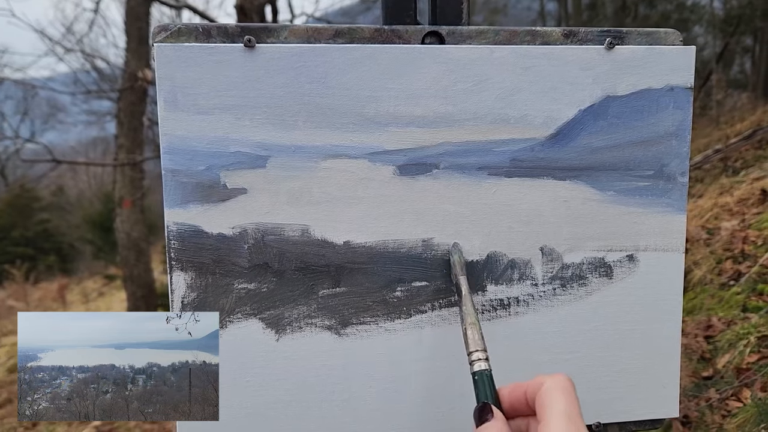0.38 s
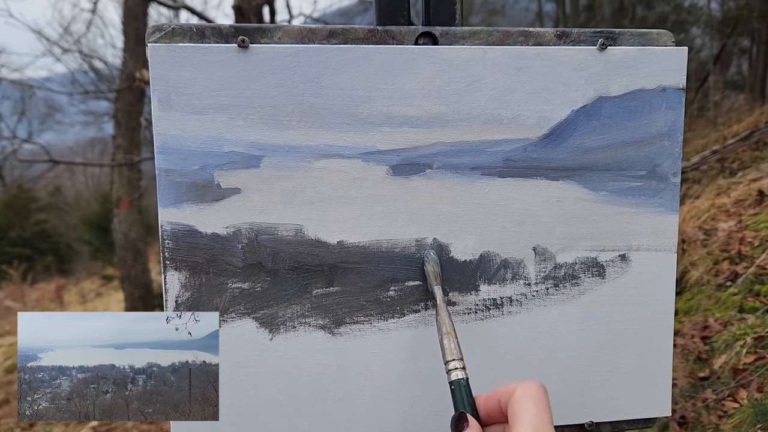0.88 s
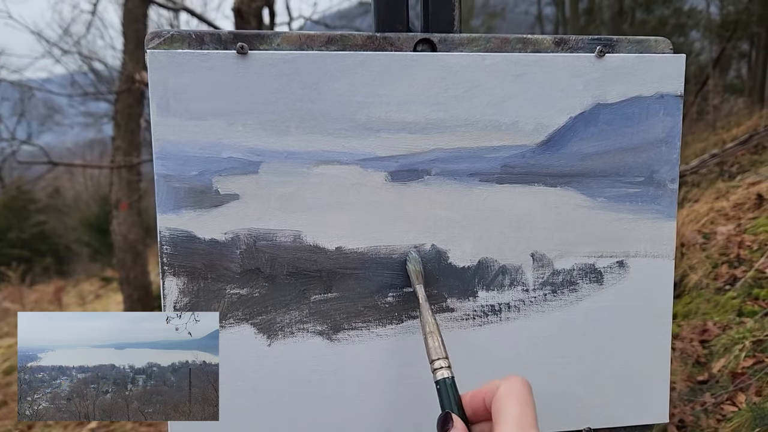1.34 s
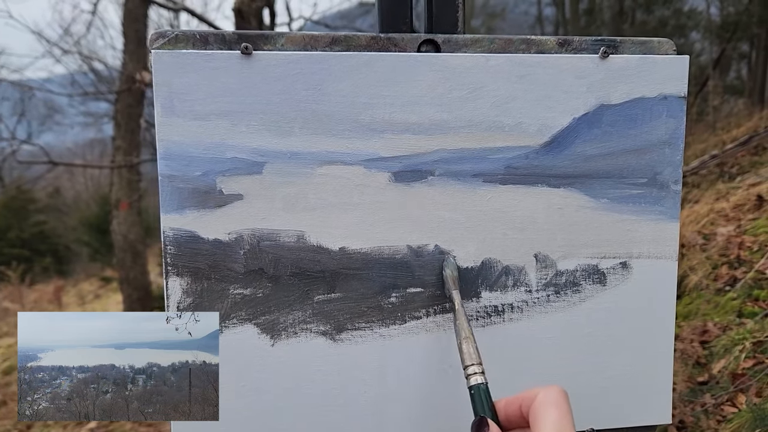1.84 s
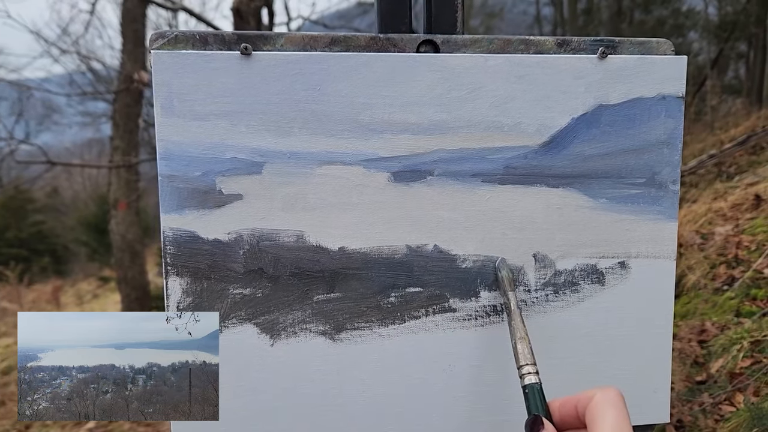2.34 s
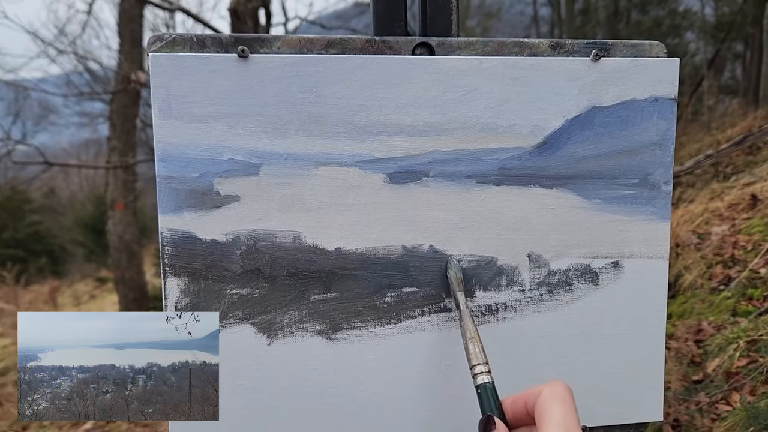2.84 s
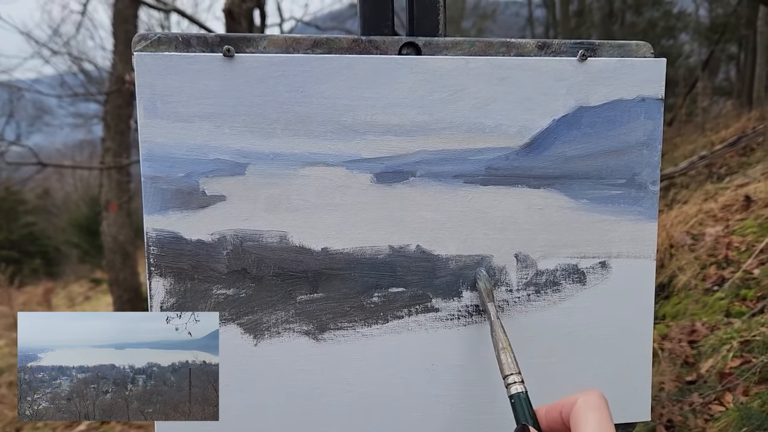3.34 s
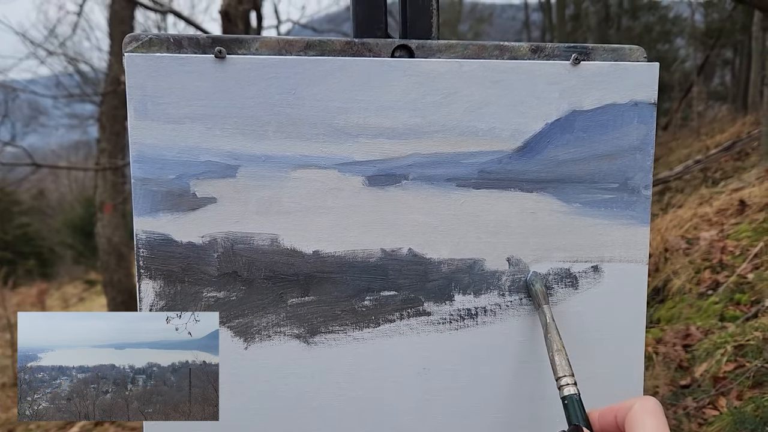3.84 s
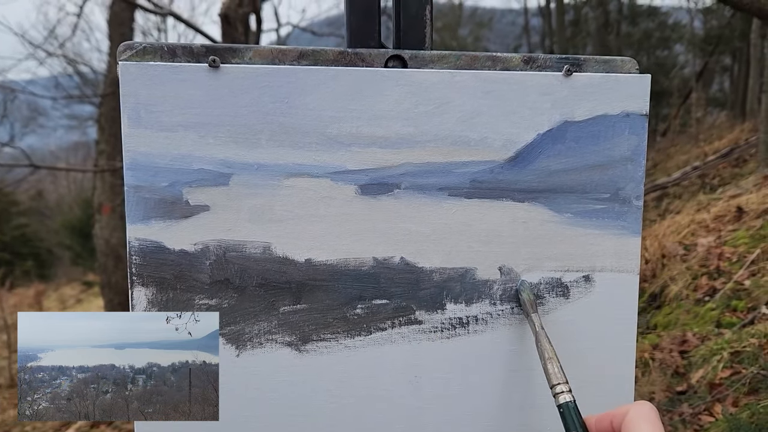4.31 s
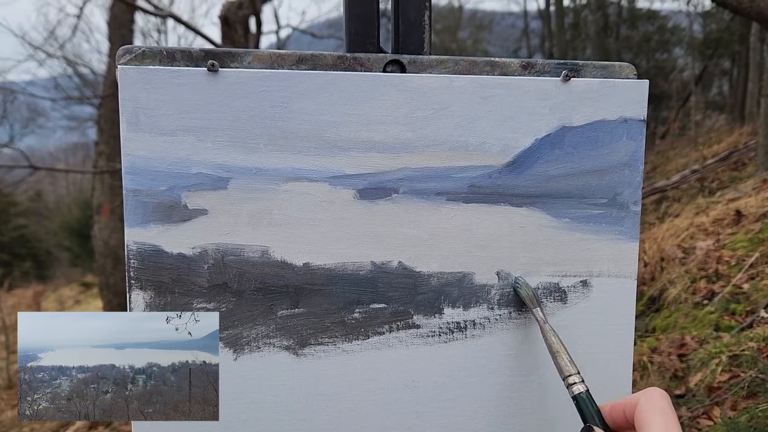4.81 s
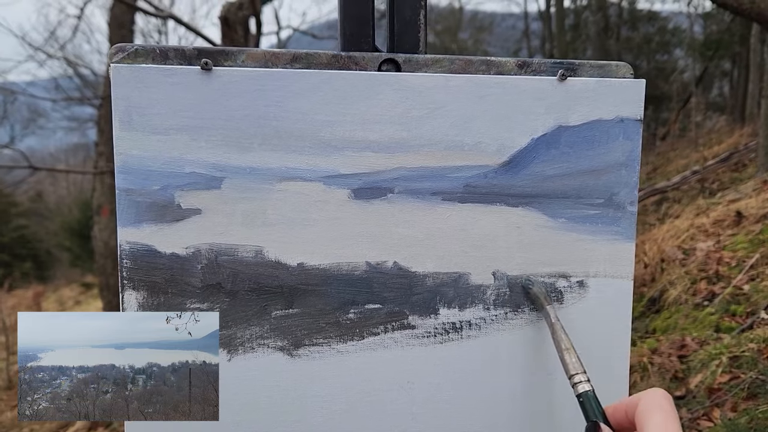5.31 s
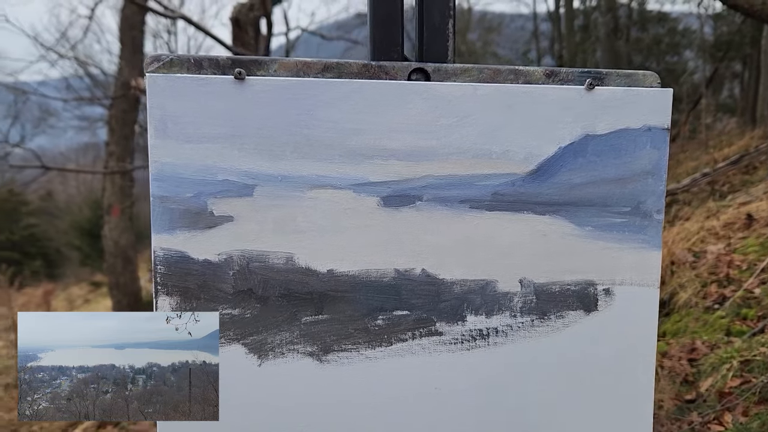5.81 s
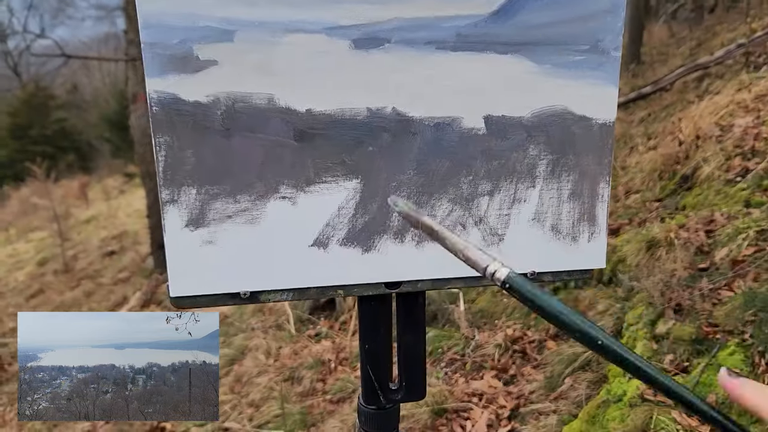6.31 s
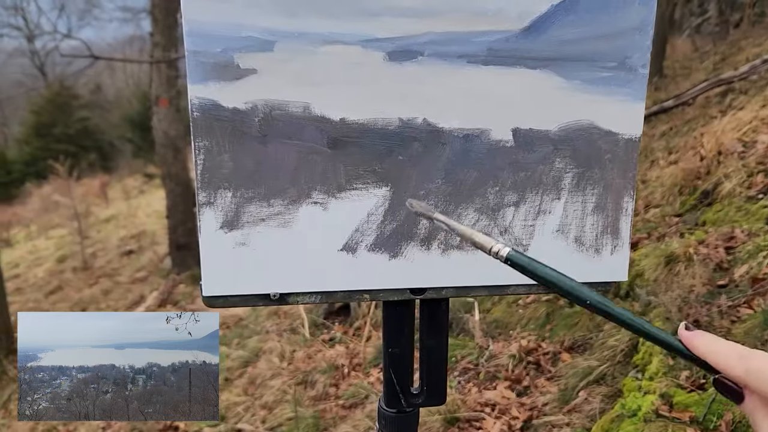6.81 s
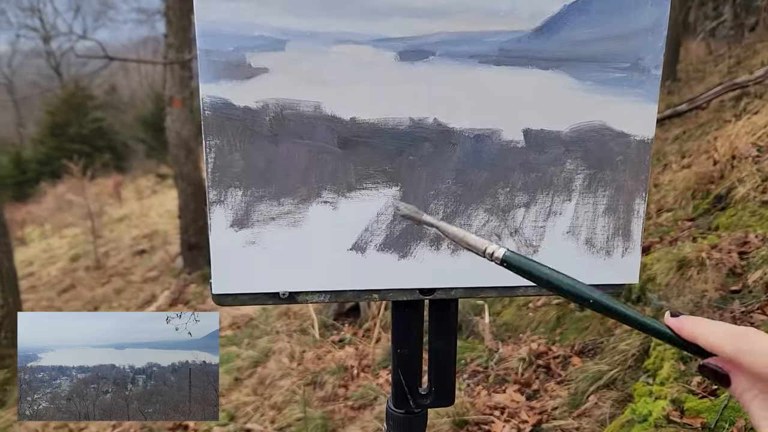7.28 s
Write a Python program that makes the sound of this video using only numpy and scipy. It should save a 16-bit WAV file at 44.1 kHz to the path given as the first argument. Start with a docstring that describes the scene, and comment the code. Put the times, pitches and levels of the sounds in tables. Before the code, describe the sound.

A bristle brush scrubs paint onto a thin panel in faint, irregular scratchy strokes outdoors, over a steady low rumble of wind.

```python
"""A bristle brush scrubs paint onto a thin panel on an easel outdoors, close to a two-port recorder.
Tips hiss and the belly drags and rasps, both as noise with sparse grains; the panel rings in a few modes,
and a few dry ticks crack. Behind lie a hollow murmur of drifting narrow-band noise, a low rumble of wind,
a far rush of air in trees as coloured stereo noise, and microphone hiss.
Late on, the sound cuts to another place."""
import sys
import numpy as np
from scipy import signal
from scipy.fft import rfft, irfft, next_fast_len
from scipy.io import wavfile
from scipy.ndimage import uniform_filter1d, map_coordinates

SR = 44100
rng = np.random.default_rng(int(sys.argv[2]) if len(sys.argv) > 2 else 0)


def boost(x):
    """Linear amplitude factor 10**(x/20) for a level x in decibels (scalar or array-like)."""
    u = np.asarray(x, float) / 20
    return 10 ** u


def materialize(psi):
    """Save the field psi as 16-bit PCM at rate SR to the path in sys.argv[1].

    A 1-D psi becomes a single channel; in a 2-D psi each row is a channel.
    """
    bounded = np.clip(np.atleast_2d(psi).T, -1, 1)
    quanta = np.round(bounded * 32767).astype(np.int16)
    wavfile.write(sys.argv[1], SR, quanta)


N = 326942
CUT_S = 6.267  # the cut to another place
FIRM_DB, FIRM_S = -70, .17  # tips level and length of a firm stroke, the reference for rasp and sheen
PANEL_LATE_S = 0.0033  # the panel answers a little after the tips


def unit(x):
    """Scaled to rms 1."""
    return x / np.sqrt(np.mean(x ** 2) + 1e-20)


def along(points, hz):
    """(f/Hz, value) points read on a log frequency axis."""
    f, value = np.transpose(points)
    return np.interp(np.log(hz + 1), np.log(f + 1), value)


def curves(rows):
    """One value per sample for each column after the time."""
    s, *columns = np.transpose(rows)
    return [np.interp(np.arange(N) / SR, s, column) for column in columns]


def wobble(rate):
    """A smooth random curve, rate knots a second."""
    knots = rng.standard_normal(int(N * rate / SR) + 4)
    return map_coordinates(knots, [np.arange(N) * rate / SR])


def filtered(x, response):
    """x shaped by a response that is a function of frequency."""
    m = next_fast_len(N + 8192)
    return irfft(rfft(x, m) * response(np.fft.rfftfreq(m, 1 / SR)), m)[..., :N]


def coloured(x, spectrum):
    """x shaped by a table of (f/Hz, level/dB)."""
    return filtered(x, lambda hz: boost(along(spectrum, hz)))


def split(x, hz):
    """Parts of x under and over a frequency, each of rms 1."""
    low = filtered(x, lambda f: 1 / (1 + (f / hz) ** 12))
    return unit(low), unit(x - low)


def resonance(f, hz, width):
    """Response of one damped mode."""
    return 1j * f * width / (hz * hz - f * f + 1j * f * width)


def field(shape, bins, frames):
    """A random map over frequency and time, smooth over some bins and frames."""
    smooth = uniform_filter1d(rng.standard_normal(shape), bins, 0)
    return unit(uniform_filter1d(smooth, frames, 1))


def ports(pair, balance):
    """Each microphone port has its own colour; half the tilt goes to either side."""
    return filtered(pair, lambda hz: boost(np.outer([.5, -.5], along(balance, hz))))


# brush strokes: [t/s of the peak, rise/s, fall/s, tips/dB, drag/dB, panel/dB]; rise and fall span 20 dB
BRUSH_STROKES = [(0.215, 0.087, 0.02, -76.0, -84, -84), (0.259, 0.054, 0.059, -71.5, -79.0, -66.5),
                 (0.423, 0.016, 0.024, -77.5, -84, -79.0), (0.478, 0.19, 0.094, -86, -83, -66.5),
                 (0.611, 0.075, 0.038, -86, -92, -75), (0.724, 0.054, 0.039, -87, -84, -63),
                 (0.829, 0.05, 0.035, -84.5, -83, -73), (0.904, 0.041, 0.051, -81, -86, -60.5),
                 (0.925, 0.064, 0.22, -88.5, -80.5, -70.5), (1.165, 0.061, 0.14, -77.5, -72.5, -61.5),
                 (1.3, 0.169, 0.086, -79, -73, -69.5), (1.431, 0.14, 0.082, -82, -80, -63),
                 (1.698, 0.082, 0.077, -69.5, -72.5, -62.5), (1.79, 0.26, 0.23, -79.5, -67.5, -68),
                 (1.855, 0.027, 0.053, -78.0, -76, -71), (2.21, 0.12, 0.096, -69.0, -73.5, -63.5),
                 (2.642, 0.085, 0.106, -83.5, -84, -81), (2.767, 0.09, 0.043, -85.0, -74, -60.0),
                 (3.011, 0.093, 0.098, -69, -75, -64), (3.357, 0.12, 0.088, -87.0, -93, -78),
                 (3.479, 0.1, 0.08, -89.5, -83, -65.5), (3.683, 0.069, 0.096, -63.5, -69.5, -57.0),
                 (4.207, 0.16, 0.11, -79, -72.5, -67.5), (4.292, 0.103, 0.12, -82, -70, -69.5),
                 (4.578, 0.16, 0.058, -81.0, -74.5, -61.5), (4.72, 0.17, 0.088, -76, -70.5, -69),
                 (4.812, 0.097, 0.023, -75.5, -69.5, -69), (4.841, 0.045, 0.17, -71, -68.5, -62.5),
                 (5.085, 0.064, 0.09, -71.5, -68.0, -65), (5.155, 0.076, 0.071, -65.0, -69, -56.5),
                 (5.341, 0.066, 0.07, -60, -60.0, -49.5), (5.589, 0.13, 0.13, -76.5, -83.0, -63.5),
                 (5.715, 0.15, 0.1, -66.5, -60.5, -62.5), (5.81, 0.1, 0.074, -69, -64.5, -67.0),
                 (5.918, 0.28, 0.13, -77.5, -69, -66.5), (6.014, 0.037, 0.1, -80.5, -76.5, -80),
                 (6.211, 0.18, 0.15, -82.5, -71.5, -67.5), (6.271, 0.036, 0.269, -80.5, -70.5, -68.5),
                 (6.42, 0.14, 0.14, -78, -78, -75), (6.487, 0.108, 0.092, -82, -70.5, -66),
                 (6.658, 0.25, 0.1, -78, -69.5, -68.5), (6.737, 0.21, 0.1, -77.0, -69.5, -70.0),
                 (6.941, 0.28, 0.24, -89.0, -83.0, -75.5), (7.3, 0.13, 0.21, -75, -68, -71.5),
                 (7.374, 0.057, 0.069, -74.5, -70, -70.0)]


def stroked(peaks_db, late_s=0):
    """Level in dB over time of all strokes together, each swelling to its peak and dying away."""
    t, power = np.arange(0, N, 64) / SR, 1e-13
    for (s, rise, fall, *_), peak_db in zip(BRUSH_STROKES, peaks_db):
        s = s + late_s
        distance = np.abs(np.where(t < s, (s - t) / rise, (t - s) / fall))
        power = power + boost(peak_db - 20 * distance ** 1.94) ** 2
    return np.interp(np.arange(N) / SR, t, 10 * np.log10(power))


def slips(share, spread_db):
    """Many bristles catch and let go: sparse uneven impulses on a bed of fine noise."""
    sizes = boost(spread_db * rng.exponential(1, N)) * rng.standard_normal(N)
    grains = unit(sizes * (rng.random(N) < .05))
    return np.sqrt(share) * grains + np.sqrt(1 - share) * rng.standard_normal(N)


# colour of the bristle tips: [f/Hz, level/dB]
TIPS_COLOUR = [(3000, -34), (5000, -0.5), (5700, -19.5), (6900, -2), (7400, -4.5), (7800, -8), (8250, 1),
               (8700, 9), (9400, -0.5), (10200, -8), (11500, -4), (12900, -7), (13700, -14.5),
               (14400, -5.5), (15700, -17.5)]


def bristle_tips():
    """Tips hiss: quiet strokes are a narrow band near 7.75 kHz, loud ones fill the band and add a top sheen."""
    _, rise, fall, tips_peak, _, _ = np.transpose(BRUSH_STROKES)
    tips_db = stroked(tips_peak)
    hiss, sheen = split(coloured(slips(0.42, spread_db=4.0), TIPS_COLOUR), hz=10400)
    narrow = unit(filtered(hiss, lambda f: resonance(f, hz=7750, width=750) ** 2))
    spread = np.clip((tips_db + 88) / 24, .15, 1)
    hiss = spread * hiss + np.sqrt(1 - spread ** 2) * narrow
    # long sweeps shine more than short dabs: 2 dB per doubling of length
    sweep_db = stroked(tips_peak + 2 * np.log2((rise + fall) / FIRM_S)) - FIRM_DB
    # below a knee the sheen level falls 3.4 dB for each dB of tips level
    sheen_db = -71 + np.minimum(sweep_db, 3.4 * (sweep_db + 7))
    lift_db = 0.5 * (np.arange(N) >= CUT_S * SR)  # slightly more sheen after the cut
    return boost(tips_db) * hiss + boost(sheen_db + lift_db) * sheen


# colour of the dragging brush: [f/Hz, level/dB]
DRAG_COLOUR = [(1000, -53), (1700, -6.5), (2820, -7.5), (3070, -3), (3200, 0.5), (4370, 3), (4730, 0),
               (6000, -10.5), (7800, -3), (13200, -120)]


def loaded_drag():
    """The belly of the loaded brush drags low and rasps high; the rasp follows both tips and drag."""
    _, _, _, tips_peak, drag_peak, _ = np.transpose(BRUSH_STROKES)
    rasp_peak = -71 + 0.7 * (tips_peak - FIRM_DB) + 0.6 * (drag_peak - FIRM_DB)
    drag, rasp = split(coloured(slips(.25, spread_db=0.5), DRAG_COLOUR), hz=2744)
    return boost(stroked(rasp_peak)) * rasp + boost(stroked(drag_peak)) * drag


# panel resonances: [f/Hz, width/Hz, level/dB]
PANEL_MODES = [(686, 114, 7), (1055, 250, 2), (1441, 192, 1.5), (1850, 720, -17)]


def wood(f):
    """Sum of the damped panel modes with alternating sign, thinned in the bass."""
    modes = sum((-1) ** k * boost(db) * resonance(f, hz, width)
                for k, (hz, width, db) in enumerate(PANEL_MODES))
    return modes / (1 + (480 / (f + 1)) ** 4)


def panel():
    """The brush's slips drive the panel's modes; between strokes it hums on faintly."""
    panel_peak = np.transpose(BRUSH_STROKES)[-1]
    ring = unit(filtered(slips(0.17, spread_db=1.5), wood))
    before = np.arange(N) < CUT_S * SR
    idle = boost(np.where(before, -69, -77) + 0.83 * wobble(7))
    return np.hypot(boost(stroked(panel_peak, PANEL_LATE_S)), idle) * ring


# port colour for near sounds: [f/Hz, left over right/dB]
NEAR_BALANCE = [(300, -6), (1300, 1.5), (2400, -2), (3200, -5.5), (4400, -9.5), (5800, 14), (7500, 3.5),
                (9000, 4.5), (10200, 0.5), (11000, 0), (12300, 3), (14500, 6), (16000, -7)]
# side the brush works on, added to the port colour: [t/s, left over right/dB]
BRUSH_PLACE = [(0.0, 7), (5.2, 5), (5.8, 1.5), (6.44, 5.5), (6.7, 7.5), (7.41, 8.5)]


def near(x, turns, streak_db):
    """Paths from contact to ports: narrow peaks and phase turns that drift as the brush moves."""
    z = signal.stft(x, nperseg=1024)[2]
    paths = []
    for _ in "LR":
        peaks = boost(streak_db * field(z.shape, 2, 10))
        paths.append(peaks * np.exp(1j * turns * field(z.shape, 3, 20)))
    pair = ports(signal.istft(z * paths, nperseg=1024)[1][:, :N], NEAR_BALANCE)
    return pair * boost(np.outer([.5, -.5], *curves(BRUSH_PLACE)))


def brush():
    """Tips and drag chatter together; with the panel they reach the ports along the same paths."""
    chatter = boost(.5 * wobble(60))
    bristles = bristle_tips() + loaded_drag()
    return near(chatter * bristles + panel(), turns=1.78, streak_db=2.5)


# dry ticks of snapping bristles; the last is the click of the cut:
# [t/s, level/dB before the port gains, f/Hz of the ring]
DRY_TICKS = [(.4205, -65, 3600), (4.5635, -62, 7600), (5.4184, -61, 7830), (5.6188, -50, 14900),
             (5.6253, -28, 14200), (5.6276, -34, 14600), (5.7455, -47, 4440), (6.2669, -52, 3500)]


def ticks():
    """Each tick is a brief crack and ring, out of step at the ports, with weaker neighbours around it."""
    out, t = np.zeros((2, N + SR)), np.arange(SR // 100) / SR
    shape = (1 - np.exp(-t / .0003)) * boost(-60 * t / .0022)
    shape = shape / shape.max()
    for tick_s, tick_db, tick_hz in DRY_TICKS:
        for k in range(-2, 3):
            # neighbours lie 0.9 ms apart, lose 12 dB a step and ring at 13.2 kHz
            s, db, hz = tick_s + k * .0009, tick_db - 12 * abs(k), 13200 if k else tick_hz
            crack = np.diff(rng.standard_normal((2, len(t) + 1))) * .26
            ring = np.sin(2 * np.pi * hz * t + rng.uniform(0, 2 * np.pi) + [[0], [2.3]])
            start = round(s * SR)
            out[:, start:start + len(t)] += boost(db) * shape * (ring + crack)
    return out[:, :N] * boost([[2.5], [-4]])


# hollow murmur that comes and goes: [t/s, level/dB]
MURMUR_LEVEL = [(0.0, -74.5), (1.6, -77.5), (1.79, -64), (2.4, -74.5), (2.75, -70.5), (3.5, -70.5),
                (3.95, -83), (4.3, -64.5), (4.55, -65), (5.0, -80), (5.18, -63), (5.25, -77), (5.75, -75),
                (5.91, -59.5), (5.95, -70), (6.07, -62.5), (6.13, -73), (6.185, -58.5), (6.262, -64),
                (6.272, -77), (7.2, -80), (7.35, -72)]


def murmur():
    """Narrow noise with a drifting centre, like air across a hollow; it swells as the panel is pressed."""
    level_db, = curves(MURMUR_LEVEL)
    pressed_db = stroked(np.transpose(BRUSH_STROKES)[-1], PANEL_LATE_S) - 11.5
    level = np.hypot(boost(level_db + 1.3 * wobble(9)), boost(pressed_db))
    slow = filtered(rng.standard_normal((2, N)), lambda f: 1 / (1 + (f / 65) ** 4))
    phase = 2 * np.pi * np.cumsum(612.6 + 22.05 * wobble(4)) / SR  # centre and drift in Hz
    left = slow[0] * np.cos(phase) + slow[1] * np.sin(phase)
    right = slow[0] * np.cos(phase - 1.2) + slow[1] * np.sin(phase - 1.2)
    return level * unit(np.array([left, right * boost(-3.0)]))


# how alike far sound is at the two ports: [f/Hz, likeness/0-1]
FAR_LIKENESS = [(30, 1), (60, 0.98), (160, 0.99), (270, 0.8), (500, 0.7), (1000, 1), (2000, 0.3), (5000, 0)]


def diffuse(spectrum, patchy_db, lag_s):
    """Far stereo noise of rms 1: alike in the bass, unrelated at the top, one port a little late."""
    z = signal.stft(rng.standard_normal((2, N)), nperseg=512)[2]
    patches = boost(patchy_db * field(z.shape[1:], 4, 14))
    pair = signal.istft(z * patches, nperseg=512)[1][:, :N]

    def mid_side(hz):
        turn = np.arccos(np.clip(along(FAR_LIKENESS, hz), 0, 1)) / 2
        return boost(along(spectrum, hz)) * [np.cos(turn), np.sin(turn)]

    mid, side = filtered(pair, mid_side)
    late = lambda hz: np.exp(np.outer([-1j, 1j], np.pi * hz * lag_s))  # negative lag: left leads
    return unit(filtered(np.array([mid + side, mid - side]), late))


# colour of the wind rumble: [f/Hz, level/dB]
RUMBLE_COLOUR = [(12, -46), (20, -23), (54, 0.5), (75, 0), (121, -4.5), (226, -17), (264, -22), (370, -21),
                 (450, -29.5), (580, -50), (990, -120)]


def rumble(level_db):
    """Low wind noise, nearly the same at both ports, its level wavering slowly."""
    return boost(level_db + 1.2 * wobble(2.865)) * diffuse(RUMBLE_COLOUR, patchy_db=1.04, lag_s=-0.000084)


# colour of the far rush before the cut: [f/Hz, level/dB]
RUSH_COLOUR = [(180, -36), (300, -11.5), (369, -8.5), (453, -10), (528, 1), (586, -18), (808, -0.5),
               (980, -10.5), (1170, -12.5), (1520, -23), (2090, -25), (4310, -37), (6500, -45), (8450, -81),
               (14300, -120)]
# colour of the far rush after the cut: [f/Hz, level/dB]
RUSH_COLOUR_AFTER = [(150, -29), (250, -3.5), (380, -4.5), (520, -15.5), (750, -15), (1200, -24),
                     (2200, -33.5), (4000, -44.5), (6500, -44), (9000, -77)]
# port colour for far sounds: [f/Hz, left over right/dB]
FAR_BALANCE = [(150, 5), (400, 1), (800, 2.5), (1800, 16.5), (2600, 2.5), (3500, 7), (4300, -7), (5500, 3),
               (6800, 5)]


def rush(level_db):
    """Air in far trees reaches the left port first; it is duller and more even after the cut."""
    before = boost(level_db + .8 * wobble(3.9)) * diffuse(RUSH_COLOUR, patchy_db=3.0, lag_s=-0.00041)
    after = boost(level_db) * diffuse(RUSH_COLOUR_AFTER, patchy_db=2.6, lag_s=-0.00038)
    return ports(np.where(np.arange(N) < CUT_S * SR, before, after), FAR_BALANCE)


# wind levels before wavering and port colour: [t/s, rumble/dB, far rush/dB]
WIND_LEVELS = [(0.0, -44, -67), (.4, -48, -65.5), (1.04, -47.5, -65.5), (1.5, -49, -63), (2.5, -47.5, -67),
               (2.9, -45.5, -65.5), (4.05, -48.5, -67.5), (4.6, -48.5, -66.5), (5.44, -48, -67.5),
               (6.2, -48, -66.5), (6.35, -49.5, -59.5), (7.0, -46.5, -63.5), (7.22, -49.5, -61),
               (7.41, -46.5, -61.5)]


def wind():
    """The low rumble under the far rush, each riding its own level curve."""
    rumble_db, rush_db = curves(WIND_LEVELS)
    return rumble(rumble_db) + rush(rush_db)


# colour of the microphone hiss, peaked by the port cavities: [f/Hz, level/dB]
HISS_COLOUR = [(4000, -36), (6800, -21), (7700, -7), (8800, -16), (10300, -18), (11000, -56), (11350, 1),
               (12100, 8), (12700, -4.5), (13000, -31), (15000, -33)]


def microphone_hiss():
    """The microphones' own noise, peaked by the port cavities and stronger on the left."""
    hiss = unit(coloured(rng.standard_normal((2, N)), HISS_COLOUR))
    return boost([[-86], [-99]]) * hiss


def scene():
    """Brush and ticks near, murmur and wind behind."""
    return brush() + ticks() + murmur() + wind()


def top_cut(x):
    """Nothing passes above the cut-off."""
    return signal.sosfilt(signal.butter(12, 16500, fs=SR, output="sos"), x)


def record(dry):
    """Microphone hiss joins the scene, then the extreme treble steps down by 24 dB."""
    edge = lambda hz: boost(np.interp(hz, [15630, 15880], [0, -24]))
    mix = filtered(dry + microphone_hiss(), edge)
    return top_cut(mix)


dry = scene()
out = record(dry)
materialize(out)
```